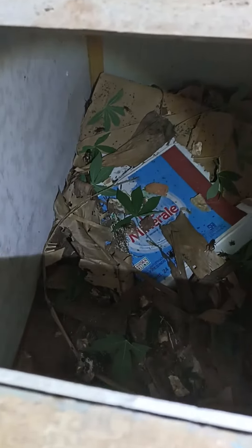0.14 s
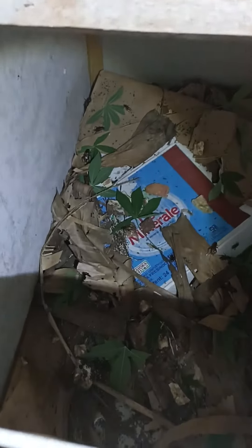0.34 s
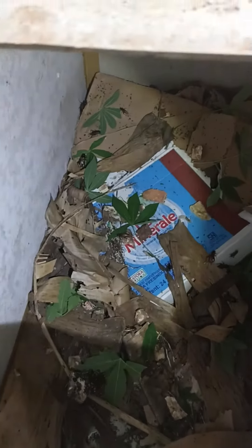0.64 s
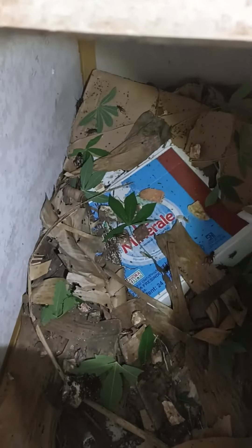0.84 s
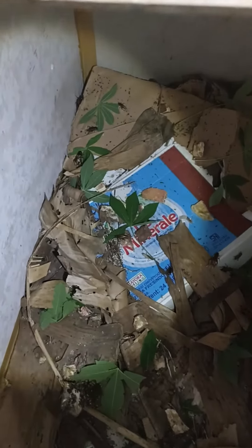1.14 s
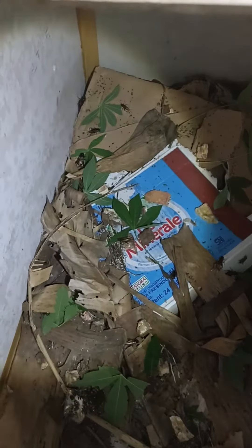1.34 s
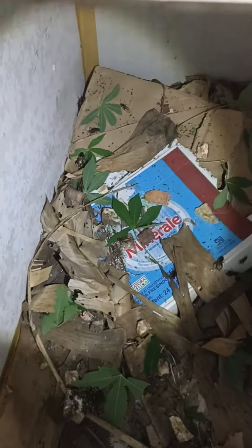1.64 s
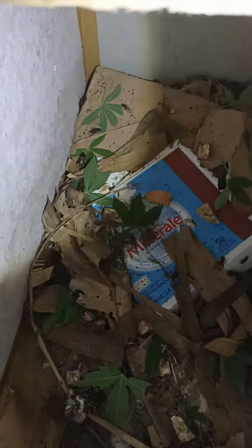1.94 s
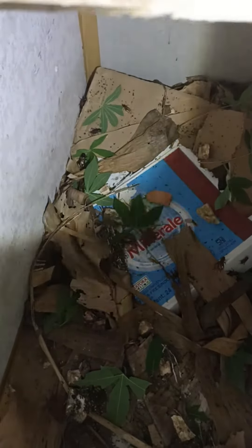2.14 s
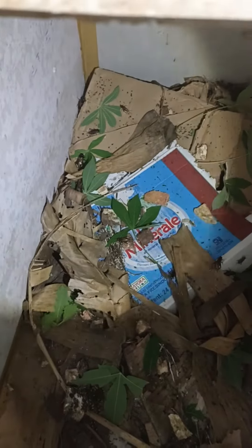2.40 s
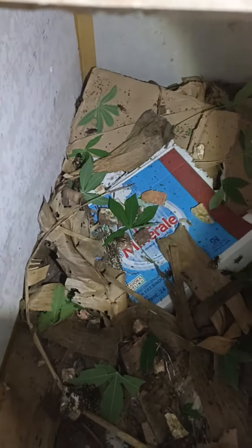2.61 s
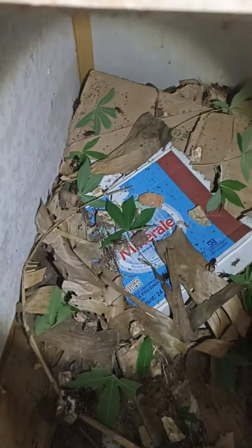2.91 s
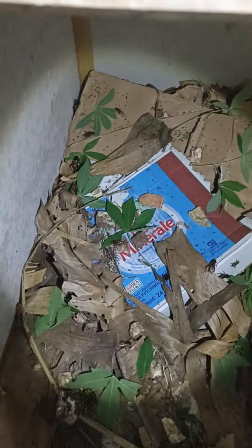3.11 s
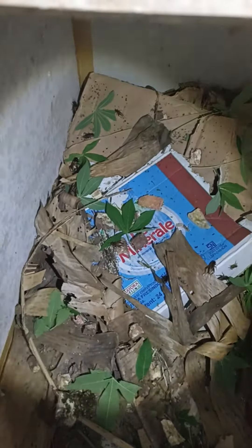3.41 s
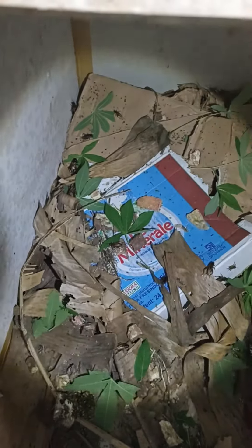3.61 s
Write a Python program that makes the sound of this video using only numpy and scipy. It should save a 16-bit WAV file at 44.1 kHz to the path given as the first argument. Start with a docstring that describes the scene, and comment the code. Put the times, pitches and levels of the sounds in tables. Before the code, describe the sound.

A male cricket warms up from scratchy scrapes into loud, high ringing chirps inside a leaf-lined box.

```python
"""Stereo microphone at the rim of a leaf-lined rearing box: low outdoor air and hiss, a distant motor and
drone as swaying sines, and tiny feet on the litter as random grains. Close by, one insect gives a falling
tick near six times a second; dry noise scratches come between, then a male cricket warms up from scrapes
to ringing chirps near 6 kHz, each stroke a tone, octave and rasp. Lower wing scuffs and faint whines
follow; later a dry leaf gives twice and snaps in noise cracks. The box answers close sounds briefly."""
import sys
import numpy as np
from scipy import signal
from scipy.fft import rfft, irfft, next_fast_len
from scipy.io import wavfile
from scipy.ndimage import map_coordinates

SR = 44100
rng = np.random.default_rng(int(sys.argv[2]) if len(sys.argv) > 2 else 0)


def transcribe(u):
    """Save the signal u as a 16-bit wav file named by the first command-line argument.

    u: samples, shape (n,) or (channels, n), limited to [-1, 1]; the rate is SR.
    q: integer samples, one column per channel.
    """
    v = np.clip(np.atleast_2d(u).T, -1, 1)
    q = np.round(v * 32767).astype(np.int16)
    wavfile.write(sys.argv[1], SR, q)


N = 165375  # samples, 3.75 s

# Outdoor air at the rim. Each row: frequency in Hz, relative level in dB.
AIR_COLOUR = [(15, -46), (28, -29), (50, -24.5), (69, -5), (188, -3), (306, -10.5), (600, -14.5),
              (849, -18.5), (1940, -24), (3300, -25.5), (4000, -31), (5200, -101)]
# Left-right likeness of the air. Each row: frequency in Hz, correlation (1 is mono).
AIR_LIKENESS = [(60, 0.88), (150, 0.76), (300, 0.54), (1000, 0.017), (3000, 0.021)]
# Air above the split. Each row: time in seconds, gain in dB before the sway.
AIR_MIDS_GAIN = [(.3, 3.5), (.65, 0.3), (.88, 3.3), (1.5, -0.5), (3.1, -0.5), (3.75, -1)]
# Faint hiss. Each row: frequency in Hz, relative level in dB.
HISS_COLOUR = [(3000, -40), (4200, -4.5), (5500, 0), (6700, 0), (8000, -13.5), (10500, -13.5),
               (13000, -4.5), (15500, -17)]
# Side the hiss leans to. Each row: frequency in Hz, left minus right in dB.
HISS_LEAN = [(4000, -4), (8000, -5), (11000, 8.5), (15500, 11)]
# Distant motor lines. Each row: multiple of the firing rate, early level in dB, late level in dB.
MOTOR_LINES = [(5, -73, -56.5), (6, -64, -55)]
# The motor's rise from early to late level: start in seconds, end in seconds.
MOTOR_SWELL_S = (1.47, 2.6)
# Tiny feet on dry leaves. Each row: time in seconds, middle level in dB.
PATTER_LEVEL = [(0, -56), (1.0, -54), (1.6, -62)]
# High ticks. Each row: start in seconds, level in dB before TICK_DB.
TICK_STROKES = [(0.032, -33), (0.216, -39), (0.399, -31), (0.581, -34.5), (0.762, -35.5), (0.936, -39),
                (1.118, -31), (1.288, -29), (1.462, -41), (1.634, -29), (1.807, -32), (1.983, -31),
                (2.158, -30), (2.335, -30), (2.504, -31), (2.681, -39), (2.853, -29), (3.019, -29),
                (3.198, -36), (3.213, -33), (3.388, -32), (3.56, -30), (3.738, -30)]
# Scrape within each tick. Each row: frequency in Hz, relative level in dB.
TICK_SCRAPE_COLOUR = [(4000, -24), (6000, -5.5), (10000, -19.5), (12000, -6), (13300, 6), (14400, 12),
                      (16000, -11)]
# Single dry scratches. Each row: start in seconds, level in dB before SCRATCH_DB.
DRY_SCRATCHES = [(0.118, -55), (.149, -52.5), (0.288, -52), (0.56, -52), (0.691, -62), (.721, -50.5),
                 (.847, -50.5), (.868, -54), (.897, -45), (1.609, -49.5), (3.481, -59), (3.509, -65)]
# Closing wing strokes. Each row: time in seconds, pitch in Hz before the glide,
# tone level in dB before the trims, rasp level in dB before RASP_DB.
WING_STROKES = [(0.43, 5990, -48, -58), (0.595, 5890, -39, -52), (1.022, 6070, -55, -56),
                (1.045, 5860, -35, -54), (1.067, 5870, -41, -56), (1.206, 6130, -47, -47),
                (1.23, 5840, -34, -51), (1.443, 5950, -31, -56), (1.47, 5890, -29, -53),
                (1.63, 5830, -34, -52), (1.656, 5880, -30, -53), (1.841, 5860, -45, -48),
                (1.866, 5800, -34, -53), (1.894, 5880, -28, -51), (1.921, 5900, -27, -53),
                (2.125, 6070, -52, -54), (2.154, 5780, -34, -48), (2.179, 5830, -29, -52),
                (2.337, 6000, -51, -51), (2.364, 5880, -28, -49), (2.391, 5940, -23, -52),
                (2.56, 5880, -34, -49), (2.587, 5910, -25, -53), (2.741, 5840, -42, -52),
                (2.767, 5850, -32, -51), (2.794, 5890, -23.5, -54), (2.982, 5760, -45, -53),
                (3.005, 5870, -31, -51), (3.031, 5890, -28, -51), (3.163, 5860, -36, -52),
                (3.198, 6070, -53, -54), (3.218, 5990, -43, -50), (3.238, 5930, -37, -50),
                (3.257, 6050, -40, -52), (3.35, 5830, -38, -52), (3.375, 5880, -29, -53),
                (3.402, 5890, -23, -51), (3.506, 6110, -35, -49), (3.533, 6100, -35, -50),
                (3.57, 5880, -31, -45), (3.598, 5910, -24, -50), (3.626, 5920, -22, -55),
                (3.723, 5890, -33, -52)]
# The file's rasp at the left port. Each row: frequency in Hz, relative level in dB.
RASP_COLOUR_LEFT = [(2500, -19.5), (4200, -25), (5000, 0), (6500, 2), (7400, -11), (8700, -9.5), (9600, -6),
                    (10600, -18.5), (12300, -0.5), (14000, -2.5), (16000, -6.5)]
# The file's rasp at the right port. Each row: frequency in Hz, relative level in dB.
RASP_COLOUR_RIGHT = [(2500, -37), (4200, -10), (6500, -1.5), (7200, -6.5), (8000, 3.5), (8700, -28),
                     (9600, -6.5), (10600, -37), (13000, -18)]
# Lower wing scuffs. Each row: start in seconds, level in dB before SCUFF_DB.
WING_SCUFFS = [(.965, -55.5), (1.156, -55), (1.319, -53), (1.586, -55), (2.019, -57), (2.717, -49.5),
               (2.891, -56), (2.963, -55), (3.147, -57)]
# Faint distant whines. Each row: middle in seconds, half length in seconds, middle pitch in Hz,
# peak level in dB.
DISTANT_WHINES = [(1.71, 0.49, 668, -68), (3.352, 0.12, 1287, -66.5), (3.36, 0.095, 1140, -69),
                  (3.715, 0.055, 669, -64.5)]
# Cracks of the dry leaf. Each row: start in seconds, length in seconds, level in dB before SNAP_DB.
LEAF_CRACKS = [(2.454, 0.0088, -54.5), (2.479, 0.0043, -47.5), (2.4957, 0.0068, -41.5), (2.5, 0.011, -41.5),
               (2.517, 0.0028, -47)]
# Colour of the leaf. Each row: frequency in Hz, relative level in dB.
LEAF_COLOUR = [(900, -46), (1500, -11), (1900, -8.5), (2450, 5.5), (2800, 4.5), (3170, 9), (3500, -7),
               (5000, -30)]
# Nearest wall echoes. Each row: mean delay in seconds, level in dB.
WALL_ECHOES = [(.0058, -5.5), (.0112, -15)]
# Ring of the box behind the chirps. Each row: 60 dB decay time in seconds, level in dB.
CHIRP_BOX_RING = [(.06, -7), (.25, -11)]
# Ring behind the ticks. Each row: 60 dB decay time in seconds, level in dB.
TICK_BOX_RING = [(.05, -3.5), (.13, -8)]
# Ring behind rasps, scuffs, scratches and feet. Each row: 60 dB decay time in seconds, level in dB.
RASP_BOX_RING = [(.05, -2), (.13, -7)]
# Ring behind the leaf. Each row: 60 dB decay time in seconds, level in dB.
LEAF_BOX_RING = [(.07, -10)]
# Top of the microphone's range. Each row: frequency in Hz, gain in dB.
MICROPHONE_TOP = [(15500, 0), (15850, -11), (16500, -26)]

# All pans are left minus right in dB.
AIR_DB, AIR_PAN_DB, AIR_SPLIT_HZ, AIR_SWAY_DB = -53, -1.5, 900, .8
HISS_DB, HISS_SWAY_DB = -64, 2.8
MOTOR_HZ, MOTOR_DRIFT = 32.31, .0091  # mean firing rate, drift as a share of it
DRONE_HZ, DRONE_DB, DRONE_WAVER_HZ = 110, -63.5, 2.21
PATTER_PER_S, PATTER_SPREAD_DB, PATTER_FADE_S = 55, 4, .0015
TICK_START_HZ, TICK_SAG_HZ_PER_S, TICK_WAVER_HZ = 16070, 208000, 387
TICK_CATCH_S, TICK_CATCH_DB, TICK_GAP_S, TICK_S = .0022, -7, .0024, .0048
TICK_DB, TICK_PAN_DB, TICK_SCRAPE_DB = 7.8, 14.5, -11.5
SCRATCH_DB, SCRATCH_FADE_S = 5.5, .0064
STROKE_S, STROKE_RISE_S, STROKE_FALL_S = .012, .003, .0055
LEAD_S, LEAD_DB = .0043, 1  # the scraper bites early and sharp, before the wing rings
SAG_HZ, SAG_S, SETTLE_HZ = 740, .006, -160  # glide around each stroke's pitch
TONE_DB, TONE_PAN_DB, OCTAVE_DB, OCTAVE_PAN_DB = 2.2, -5, -11, 18
TONE_ROUGH_DB, STROKE_SCATTER_DB, WAVER_HZ = 1.8, 1, 95
CLEAN_ABOVE_DB, WEAK_WAVER_HZ = -41, 270  # weak strokes do not lock to the wing's resonance
RASP_DB, RASP_S, RASP_RISE_S, RASP_FALL_S = 7.5, .019, .003, .0024
TOOTH_SCATTER_DB, SLIP_DB, SLIPS_PER_S = 2, 3.5, 330
SCUFF_HZ, SCUFF_WAVER_HZ, SCUFF_S, SCUFF_DB, SCUFF_PAN_DB = 5200, 520, .018, 6, -2
WHINE_WAVER_HZ, WHINE_WAVERS_PER_S = 20, 90
SNAP_DB, SNAP_PAN_DB = 2.5, -10
RING_BUILD_S, PORT_DELAY_S, PORT_SCATTER_S = .004, .00043, .000028
TOP_HZ = 16700  # band limit of the microphone


def amp(db):
    """Decibels to gain."""
    return 10 ** (np.asarray(db) / 20)


def unit(x):
    """Scale to rms 1."""
    return x / np.sqrt(np.mean(x ** 2) + 1e-20)


def along(points, hz):
    """Read a curve of (Hz, value) points on a log frequency axis."""
    f, value = np.transpose(points)
    return np.interp(np.log(hz + 1), np.log(f + 1), value)


def pan(db):
    """Left and right gains for a left-minus-right level."""
    return unit(amp([[db / 2], [-db / 2]]))


def wobble(rate, size=N):
    """A smooth random curve, with rate knots a second."""
    knots = rng.standard_normal(size // 4)
    return map_coordinates(knots, [np.arange(size) * rate / SR], mode="wrap")


def noise(colour):
    """Coloured noise of rms 1."""
    gain = amp(along(colour, np.fft.rfftfreq(N, 1 / SR)))
    return unit(irfft(rfft(rng.standard_normal(N)) * gain, N))


def ages(size=4096):
    """Time axis of one short event, in seconds."""
    return np.arange(size) / SR


def swell(length, rise, fall):
    """Rounded attack, hold and release."""
    t = ages()
    attack = np.sin(np.pi / 2 * np.clip(t / rise, 0, 1))
    release = np.sin(np.pi / 2 * np.clip((length - t) / fall, 0, 1))
    return attack * release


def phase_of(hz, waver_hz, rate):
    """Phase of a wing whose pitch wavers from tooth to tooth."""
    pitch = hz + waver_hz * wobble(rate, size=len(ages()))
    return 2 * np.pi * np.cumsum(pitch) / SR


def add(out, s, x):
    """Mix x into out at time s."""
    i = max(round(s * SR), 0)
    out[:, i:i + x.shape[1]] += x[:, :N - i]


def boxed(x, ring, walls=(), delay_s=PORT_DELAY_S, size=11000):
    """Direct sound, wall echoes and ring of the box, drawn anew at each call; each channel keeps its energy."""
    t = ages(size=size)
    response = np.zeros((2, size))
    for t60, db in ring:
        tail = rng.standard_normal((2, size)) * amp(-60 * t / t60) * np.clip(t / RING_BUILD_S, 0, 1)
        response += amp(db) * unit(tail) / np.sqrt(size)
    for delay, db in walls:
        arrivals = np.abs(delay * SR + rng.normal(0, 10, 2)).astype(int)
        response[[0, 1], arrivals] += amp(db)
    lag = abs(round(rng.normal(delay_s, PORT_SCATTER_S) * SR))  # the right port is farther away
    response[[0, 1], [0, lag]] += 1
    y = signal.fftconvolve(x, response, axes=1)
    energy_in = np.sum(x ** 2, axis=1, keepdims=True)
    energy_out = np.sum(y ** 2, axis=1, keepdims=True)
    return y * np.sqrt(energy_in / energy_out)


def rasp(envelope):
    """Uneven tooth impacts in stick-slip clumps, coloured by the wing."""
    size = len(envelope)
    hz = np.fft.rfftfreq(size, 1 / SR)
    impacts = rng.standard_normal((2, size))
    tooth_db = TOOTH_SCATTER_DB * wobble(1286, size=size)
    slip_db = SLIP_DB * wobble(SLIPS_PER_S, size=size)
    colour = amp([along(RASP_COLOUR_LEFT, hz), along(RASP_COLOUR_RIGHT, hz)])
    grains = irfft(rfft(impacts * amp(tooth_db + slip_db)) * colour, size)
    return unit(envelope * grains) * np.sqrt(np.mean(envelope ** 2))


def line(hz, db):
    """A sine of given pitch and rms level."""
    return np.sqrt(2) * amp(db) * np.sin(2 * np.pi * np.cumsum(hz) / SR)


def air():
    """Low outdoor rumble under a swelling midrange; mid and side noises set how alike the ports hear it."""
    hz = np.fft.rfftfreq(N, 1 / SR)
    turn = np.arccos(np.clip(along(AIR_LIKENESS, hz), -1, 1)) / 2
    mid, side = irfft(rfft([noise(AIR_COLOUR), noise(AIR_COLOUR)]) * [np.cos(turn), np.sin(turn)], N)
    whole = amp(AIR_DB) * pan(AIR_PAN_DB) * np.array([mid + side, mid - side])
    rumble = irfft(rfft(whole) / (1 + (hz / AIR_SPLIT_HZ) ** 4), N)
    mids_db = np.interp(np.arange(N) / SR, *np.transpose(AIR_MIDS_GAIN)) + AIR_SWAY_DB * wobble(26)
    return rumble + amp(mids_db) * (whole - rumble)


def hiss():
    """Faint swaying hiss: separate noise at each port, leaning to one side by frequency."""
    lean = amp(np.outer([.5, -.5], along(HISS_LEAN, np.fft.rfftfreq(N, 1 / SR))))
    level = amp(HISS_DB + HISS_SWAY_DB * wobble(23.92))
    return level * irfft(rfft([noise(HISS_COLOUR), noise(HISS_COLOUR)]) * lean, N)


def motor_and_drone():
    """A distant motor hums louder on multiples of its drifting firing rate, over a low unsteady drone."""
    t = np.arange(N) / SR
    firing = MOTOR_HZ * (1 + MOTOR_DRIFT * wobble(6.14))
    out = line(DRONE_HZ + DRONE_WAVER_HZ * wobble(7.3), DRONE_DB + 2.6 * wobble(11))
    for multiple, early, late in MOTOR_LINES:
        db = np.interp(t, MOTOR_SWELL_S, (early, late)) + 0.15 * wobble(4.2)
        out += line(multiple * firing, db)
    return out


def patter():
    """Insects walking over the litter make tiny scratches at random, independent times."""
    draws = rng.standard_normal((400, 2))
    gaps = np.sum(draws ** 2, axis=1) / 2  # exponentially distributed, mean 1
    times = np.cumsum(gaps) / PATTER_PER_S
    sizes = np.clip(rng.standard_normal(len(times)), -2, 2)
    out, t = np.zeros((2, N)), ages(size=512)
    for s, size in zip(times, sizes):
        if s < N / SR:
            db = np.interp(s, *np.transpose(PATTER_LEVEL)) + PATTER_SPREAD_DB * size
            add(out, s, amp(db) * rasp(np.exp(-t / PATTER_FADE_S)))
    return boxed(out, RASP_BOX_RING)[:, :N]


def ticker():
    """A much finer file catches, then gives one quick stroke of falling pitch."""
    out, t = np.zeros((2, N)), ages()
    catch = amp(TICK_CATCH_DB) * swell(TICK_CATCH_S, TICK_CATCH_S / 2, TICK_CATCH_S / 2)
    main = np.interp(t - TICK_GAP_S, t, swell(TICK_S, TICK_S / 2, TICK_S / 2))
    for s, db in TICK_STROKES:
        falling = TICK_START_HZ - TICK_SAG_HZ_PER_S * t
        tone = np.sin(phase_of(falling, TICK_WAVER_HZ, rate=6800))
        scrape = amp(TICK_SCRAPE_DB) * noise(TICK_SCRAPE_COLOUR)[:len(t)]
        stroke = pan(TICK_PAN_DB) * (np.sqrt(2) * tone + scrape) * (catch + main)
        add(out, s, amp(db + TICK_DB) * boxed(stroke, TICK_BOX_RING))
    return out


def scratches():
    """A wing or leg catches briefly: a sharp, dry scratch that dies away exponentially."""
    out = np.zeros((2, N))
    for s, db in DRY_SCRATCHES:
        scratch = rasp(np.exp(-ages() / SCRATCH_FADE_S))
        add(out, s, amp(db + SCRATCH_DB) * boxed(scratch, RASP_BOX_RING))
    return out


def cricket():
    """Each stroke drags the scraper over the file: a falling tone, its octave and a rasp."""
    out, t = np.zeros((2, N)), ages()
    envelope = np.interp(t - LEAD_S, t, swell(STROKE_S, STROKE_RISE_S, STROKE_FALL_S))
    bite = amp(LEAD_DB) * swell(3 * LEAD_S, LEAD_S, 2 * LEAD_S)
    glide = SETTLE_HZ + SAG_HZ * np.exp(-t / SAG_S)
    for s, hz, tone_db, rasp_db in WING_STROKES:
        weak = np.clip((CLEAN_ABOVE_DB - tone_db) / 10 + .5, 0, 1)
        phase = phase_of(hz + glide, WAVER_HZ + weak * WEAK_WAVER_HZ, rate=1090)
        rough_db = TONE_ROUGH_DB * wobble(783, size=len(t))
        scatter_db = STROKE_SCATTER_DB * wobble(225, size=len(t))
        grip = amp(rough_db + scatter_db)
        tone = amp(TONE_DB) * pan(TONE_PAN_DB) * np.sin(phase) * envelope
        octave = amp(OCTAVE_DB) * pan(OCTAVE_PAN_DB) * np.sin(2 * phase) * (envelope + bite)
        for partial in (tone, octave):
            ringing = boxed(grip * partial, CHIRP_BOX_RING, WALL_ECHOES)
            add(out, s - LEAD_S, np.sqrt(2) * amp(tone_db) * ringing)
        scrape = rasp(swell(RASP_S, RASP_RISE_S, RASP_FALL_S))
        add(out, s - LEAD_S / 2, amp(rasp_db + RASP_DB) * boxed(scrape, RASP_BOX_RING))
    return out


def scuffs():
    """Light wing contacts that barely ring: a wavering sine, lower than the chirps."""
    out = np.zeros((2, N))
    for s, db in WING_SCUFFS:
        wing = np.sin(phase_of(SCUFF_HZ, SCUFF_WAVER_HZ, rate=788)) * swell(SCUFF_S, SCUFF_S / 2, SCUFF_S / 2)
        add(out, s, amp(db + SCUFF_DB) * boxed(pan(SCUFF_PAN_DB) * wing, RASP_BOX_RING))
    return out


def whines():
    """Faint distant whines come and go as wavering sines under bell-shaped swells."""
    t = np.arange(N) / SR
    out = np.zeros(N)
    for s, half, hz, db in DISTANT_WHINES:
        pitch = hz + WHINE_WAVER_HZ * wobble(WHINE_WAVERS_PER_S)
        out += line(pitch, db) * np.exp(-((t - s) / half) ** 2)
    return out


def leaf():
    """A dry leaf gives twice, then snaps in a quick run of cracks, each a burst of coloured noise."""
    out = np.zeros((2, N))
    for s, length, db in LEAF_CRACKS:
        envelope = swell(length, length / 3, length / 2)
        burst = noise(LEAF_COLOUR)[:len(envelope)] * envelope
        crack = unit(burst) * np.sqrt(np.mean(envelope ** 2))
        add(out, s, amp(db + SNAP_DB) * boxed(pan(SNAP_PAN_DB) * crack, LEAF_BOX_RING, delay_s=0))
    return out


def scene():
    """Everything heard at the rim of the box, near and far."""
    near = cricket() + scuffs() + ticker() + leaf() + scratches() + patter()
    far = motor_and_drone() + whines() + air() + hiss()
    return near + far


def record(dry):
    """The microphone fades at the very top; nothing passes its band limit."""
    size = next_fast_len(N + SR // 2)
    hz = np.fft.rfftfreq(size, 1 / SR)
    gain = amp(along(MICROPHONE_TOP, hz)) * (hz < TOP_HZ)
    return irfft(rfft(dry, size) * gain, size)[:, :N]


dry = scene()
out = record(dry)
transcribe(out)
```